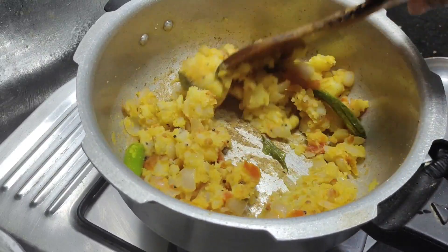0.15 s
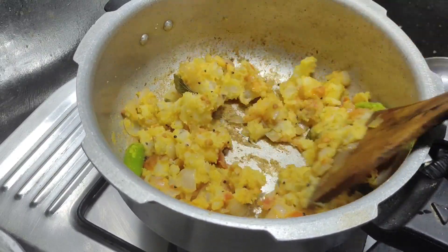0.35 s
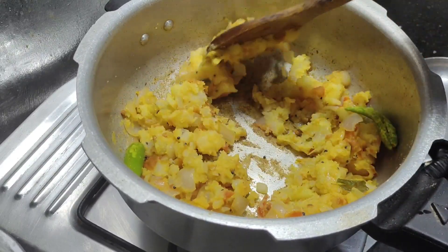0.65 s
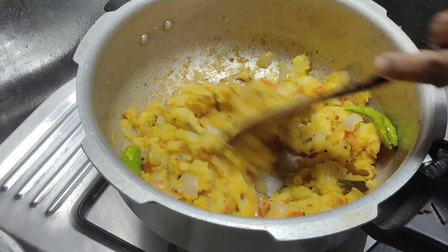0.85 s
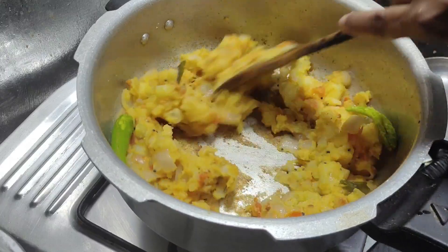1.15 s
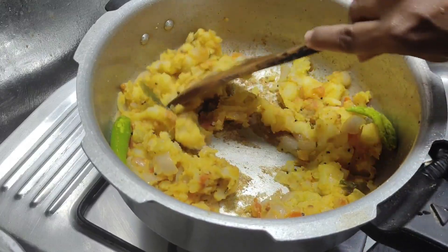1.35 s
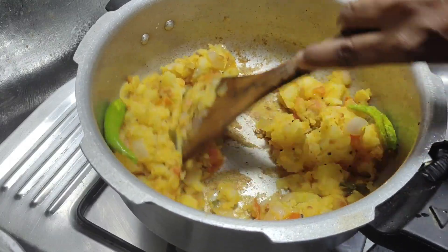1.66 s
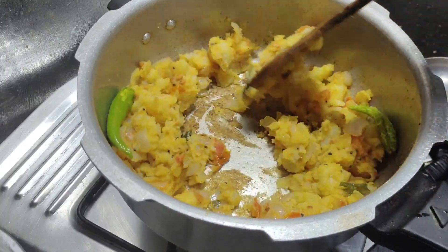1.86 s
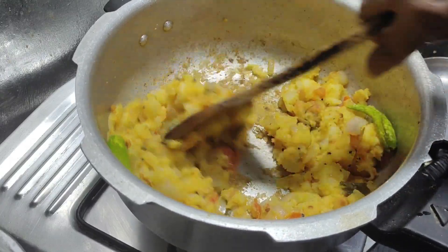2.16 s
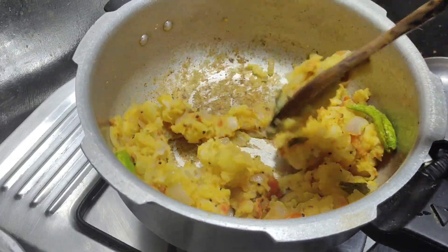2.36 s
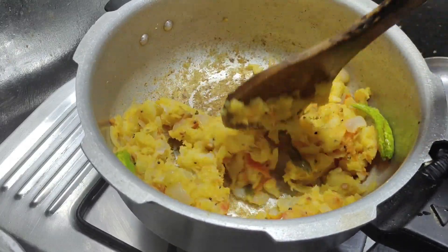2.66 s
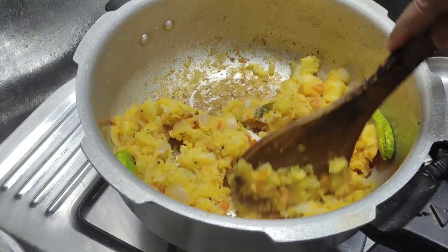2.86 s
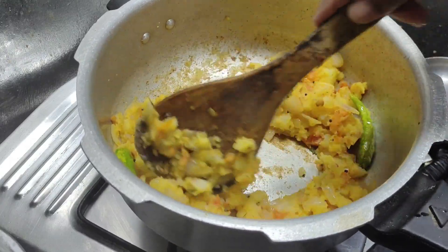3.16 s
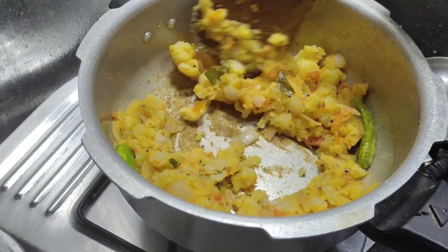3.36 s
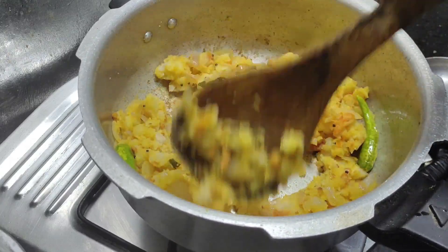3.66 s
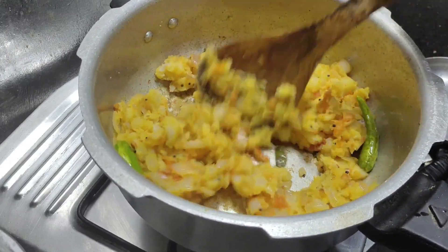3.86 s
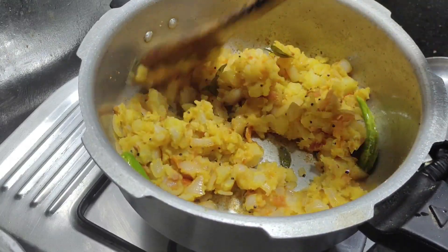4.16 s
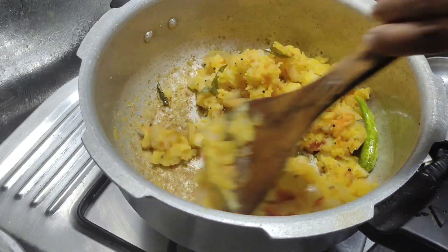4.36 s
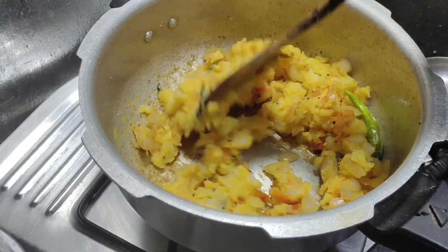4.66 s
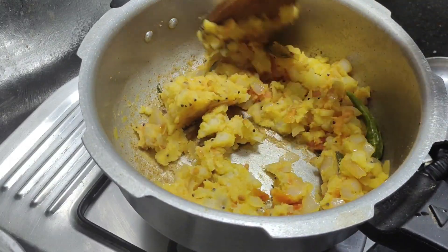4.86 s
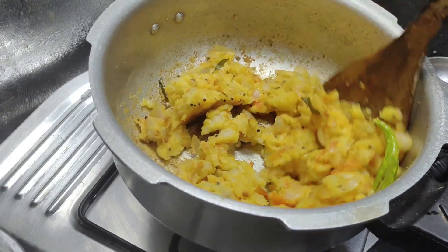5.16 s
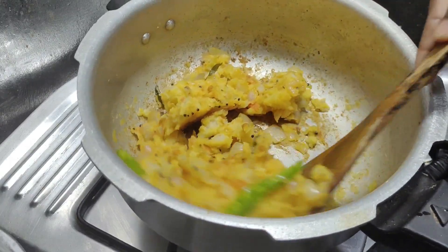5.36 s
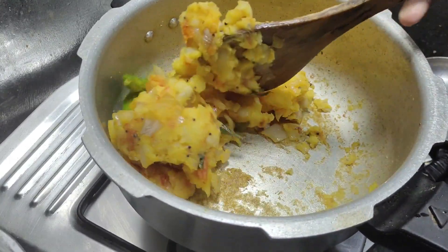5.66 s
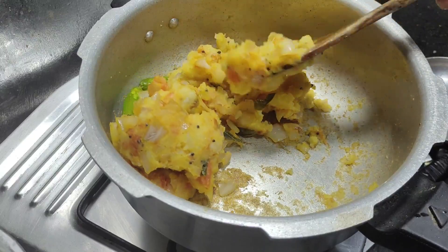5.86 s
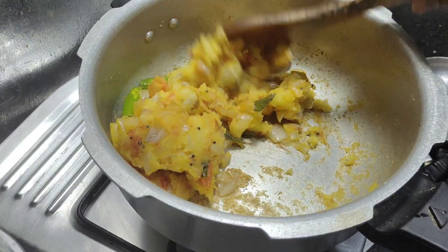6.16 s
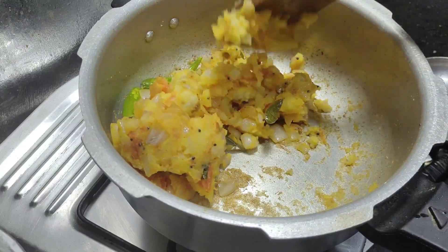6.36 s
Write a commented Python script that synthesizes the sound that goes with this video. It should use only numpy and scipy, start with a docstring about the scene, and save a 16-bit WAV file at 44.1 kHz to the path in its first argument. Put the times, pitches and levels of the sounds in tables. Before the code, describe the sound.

Close stereo pickup in a small kitchen: a wooden spatula works mashed potato in a thick metal pot. It lands again and again with hollow knocks, chattering scrapes and dull low rumbles, grit rasping faintly between. Oil sizzles softly throughout. Small squeaks appear early and midway; late on, a long snagging drag ends in a hard slam, then squeaks and a faint slide.

```python
"""Small kitchen, a close pair of microphones on a thick metal pot: a wooden spatula stirs cooked potato.
Throughout, oil sizzles softly under the food, grit rasps the wall into faint rings and the pot rumbles.
From the first moment the blade lands, again and again: most landings knock, the loaded bottom rumbles, the
edge chatters. Near 1.7 s and 2.9 s the wet edge squeaks; from 5.1 s a long drag snags and rustles into a hard
slam on the wall at 5.4 s, then squeaks; a faint slide ends it. Noise, slips and modes make the sounds."""
import sys
import numpy as np
from scipy import signal
from scipy.fft import rfft, irfft, next_fast_len
from scipy.io import wavfile
from scipy.ndimage import uniform_filter1d

SR = 44100
rng = np.random.default_rng(int(sys.argv[2]) if len(sys.argv) > 2 else 0)


def digitize_waveform(pressure):
    """Quantize a signal to 16-bit integers and store it at the path in sys.argv[1].

    Rows of a 2-D input are taken as channels; values are limited to [-1, 1].
    """
    field = np.atleast_2d(pressure).T
    bounded = np.clip(field, -1, 1)
    quanta = np.round(bounded * 32767).astype(np.int16)
    wavfile.write(sys.argv[1], SR, quanta)


def linear_from_db(decibels):
    """Turn decibels (scalar or array-like) into linear amplitude factors; 0 gives 1."""
    return 10 ** (np.asarray(decibels, float) / 20)


N = 287532  # samples

# colour of the oil and kitchen air: f/Hz, relative density/dB per Hz
SIZZLE_COLOUR = [(35, -55), (60, -36.5), (253, 2.5), (278, -40), (394, -23), (486, -15), (869, -27),
                 (932, -18.5), (2910, -23.5), (4420, -18.5), (15500, -33.5)]
# low rumble while the pot is worked: t/s, level/dB
RUMBLE_LEVEL = [(0.0, -49.5), (0.38, -66.5), (1.5, -51), (1.61, -63), (1.83, -57), (2.58, -73.5),
                (2.78, -53), (2.98, -66), (3.03, -47), (3.18, -57), (3.47, -53), (3.74, -83), (3.96, -50),
                (4.01, -55.5), (5.56, -65.5), (5.63, -54.5), (6.06, -72.5), (6.52, -64)]
# colour of that rumble: f/Hz, relative density/dB per Hz
RUMBLE_SPECTRUM = [(25, -32), (50, -24), (70, -23), (105, -13), (134, 0), (170, 6.5), (200, -12),
                   (300, -38), (15500, -94.5)]
# decay of the kitchen: f/Hz, t60/s
KITCHEN_DECAY = [(150, 0.41), (2000, 0.21), (5000, 0.21), (14000, 0.34)]
# likeness of the two microphones: f/Hz, left-right correlation
LIKENESS = [(60, .95), (300, .93), (700, .2), (15000, 0)]
# colour difference of the two microphones: f/Hz, left minus right level/dB
MICROPHONE_LEAN = [(60, 1), (130, -2.5), (290, 0), (640, -1), (1410, -3), (3100, -2.5), (5500, -8.5),
                   (7000, -14.5), (9000, 4), (11000, -3.5), (12500, -8.5), (15000, -20.5)]
# modes of the pot, damped by the food: f/Hz, relative level/dB, t60/s
POT_MODES = [(134.7, -9, 0.9), (170.6, -6.5, 0.58), (234, -6, 0.044), (285.8, 10.5, 0.041), (346, 7, 0.04),
             (386.7, 2.5, 0.21), (505.2, 0.5, 0.069), (658, 6.5, 0.039), (812, 5.5, 0.01), (880, -3, 0.26),
             (1069, 1, 0.032), (1600, -4, 0.15), (1740, 8.5, 0.033), (1994, -6, 0.07), (2520, 5, 0.57),
             (2860, 10.5, 0.068), (3340, 3.5, 0.17), (3800, -4.5, 0.0474), (4505, 8.5, 0.045),
             (5000, 4.5, 0.077), (5830, 7.5, 0.016), (6300, 1, 0.018), (7130, 11, 0.079), (7380, 13, 0.13)]
# wet food brushed along the metal: start t/s, rise/s, fall/s, peak level/dB
RUSTLES = [(.252, 0.036, 0.11, -49), (5.112, .03, 0.47, -50)]
# the sliding blade snags and rings softly: t/s, peak level/dB, f/Hz, length/s
SNAG_BURSTS = [(1.715, -39, 1414, 0.028), (1.737, -38, 1820, 0.022), (1.756, -36, 1840, 0.015),
               (1.785, -28.5, 1840, 0.008), (5.175, -32.5, 1104, 0.011), (5.199, -33, 1380, 0.0072),
               (5.219, -39.5, 1063, 0.014)]
# the wet edge makes the wall sing: start t/s, end t/s, f/Hz, start level/dB, end level/dB
SQUEAK_TONES = [(2.79, 2.9, 3395, -70, -54), (2.86, 2.975, 3395, -56, -52), (2.96, 3.2, 3395, -64, -72),
                (1.712, 1.745, 4900, -51, -60), (1.735, 1.82, 6700, -56, -49), (5.57, 5.84, 2562, -53, -65),
                (5.64, 5.81, 1725, -58, -67), (5.58, 5.84, 8610, -58, -72)]
# wood knocks on metal: t/s, peak level/dB, f/Hz, t60/s, left minus right level/dB
KNOCK_BLOWS = [(0.5466, -12, 930, 0.015, 2), (0.5477, -18, 2040, 0.011, -3),
               (0.551, -17.5, 1360, 0.0093, -5), (.841, -35.5, 524, 0.019, 3),
               (1.0825, -31.5, 730, 0.039, 3), (1.317, -14, 650, 0.0053, 2),
               (1.8221, -20, 1890, 0.028, -10), (2.101, -41, 700, 0.016, -2),
               (2.951, -23, 2296, 0.033, -9.5), (2.951, -32, 5350, 0.023, -4),
               (3.0015, -32.5, 6500, 0.0074, -3), (3.025, -18.5, 1860, 0.013, -5),
               (3.066, -25.5, 376, 0.026, -4), (3.294, -23, 2000, 0.019, -5),
               (3.367, -16, 1930, 0.013, -9.5), (3.871, -31, 1830, 0.038, -11.5),
               (3.928, -14.5, 1860, 0.017, -5), (3.9307, -22, 800, 0.02, -3),
               (4.2359, -19.5, 1250, 0.0094, -0.5), (4.666, -14.5, 900, 0.027, 1),
               (4.976, -36.5, 600, 0.052, -2), (5.392, -14.5, 720, 0.022, 3), (5.638, -30, 348, 0.082, 1),
               (6.419, -46.5, 6600, 0.011, -28)]
# grit stirred about between strokes: t/s, level/dB
GRIT_AT_REST = [(0, -54.5), (.5, -56.5), (.85, -53.5), (1.3, -56), (2.5, -56), (2.9, -57), (3.502, -54.5),
                (4.2, -56), (4.902, -59), (5.7, -73.5), (6.52, -59.5)]
# grit caught under the edge: start t/s, rise/s, fall/s, peak level/dB
GRIT_BURSTS = [(0, 0.0022, 0.18, -33.5), (0.547, 0.065, 0.25, -37), (1.704, 0.18, 0.49, -50.5),
               (2.95, 0.0046, 0.34, -58), (4.23, 0.0024, 0.52, -49.5), (4.662, 0.02, 0.13, -46.5),
               (4.971, 0.021, 0.37, -43), (5.11, 0.0048, 1., -47), (5.33, 0.063, .03, -47),
               (5.403, 0.11, 0.34, -28.5), (6.269, 0.053, 0.32, -59)]
# colour of grit on metal: f/Hz, relative density/dB per Hz
RASP_COLOUR = [(1180, -8), (2000, -6), (3490, -3), (4670, -6), (6200, -1.5), (9930, -8.5), (10900, -21),
               (12300, -23.5), (15500, -12.5)]
# the blade slides along the metal: start t/s, rise/s, fall/s, chatter level/dB, lower mode from f/Hz, to f/Hz,
# upper mode from f/Hz, to f/Hz, upper mode against the lower level/dB
BLADE_SLIDES = [(0.218, 0.052, 0.15, -65.5, 1200, 1280, 2270, 2300, 5),
                (1.099, 0.043, 0.22, -40, 920, 960, 1280, 2000, -4.5),
                (1.661, 0.14, 0.18, -41, 834, 1130, 1300, 2100, -0.5),
                (3.48, 0.096, 0.088, -75.5, 860, 880, 1550, 1530, 18),
                (5.105, 0.023, 0.47, -41, 1110, 890, 1400, 1350, -3.5),
                (5.33, 0.038, 0.074, -42, 875, 900, 1650, 1685, -4),
                (6.272, 0.058, 0.091, -62.5, 1050, 1090, 1930, 1960, -12)]
# the blade lands and digs in: t/s, hold/s, push on the bottom level/dB, chatter level/dB, lower mode f/Hz
BLADE_LANDINGS = [(0, 0.037, -34.5, -24.5, 1032), (0.552, 0.033, -31, -23.5, 976),
                  (0.837, 0.054, -41, -54, 620), (1.0763, 0.058, -42.5, -44, 774),
                  (1.308, 0.094, -36.5, -45, 685), (1.617, 0.014, -46.5, -60, 800),
                  (1.827, 0.048, -31.5, -36, 1150), (2.096, 0.18, -49.5, -57, 780),
                  (2.643, 0.081, -42, -47.5, 730), (2.953, 0.061, -33.5, -36, 1700),
                  (3.021, 0.11, -39, -42, 690), (3.294, 0.068, -36.5, -40.5, 1550),
                  (3.365, 0.0069, -26.5, -31, 880), (3.872, 0.086, -37.5, -43, 1470),
                  (3.933, 0.025, -28, -33.5, 880), (4.229, 0.051, -29, -32, 880),
                  (4.666, 0.052, -37, -25.5, 967), (4.973, 0.1, -41, -44.5, 1010),
                  (5.411, 0.12, -29.5, -30.5, 1330), (5.627, 0.033, -30.5, -39, 637)]


def evened(x):
    """Scales to rms 1."""
    return x / np.sqrt(np.mean(x ** 2) + 1e-20)


def read(points, hz):
    """Reads a spectrum on a log-frequency axis."""
    f, value = np.transpose(points)
    return np.interp(np.log(hz + 1), np.log(f + 1), value)


def likeness(hz):
    """Left-right correlation of the microphone pair at a frequency."""
    return np.clip(read(LIKENESS, hz), -1, 1)


def add(mix, s, sound):
    """Mixes a sound in at s seconds."""
    part = mix[round(s * SR):][:len(sound)]
    part += sound[:len(part)]


def swell(rise, fall, start_db, end_db):
    """Level in dB that climbs to 0 and falls away, in straight lines."""
    t = np.arange(0, rise + fall, 1 / SR)
    return np.interp(t, [0, rise, rise + fall], [start_db, 0, end_db])


def resonate(x, hz, width):
    """A moving resonance: shifts the curve hz down to zero, smooths, and shifts back."""
    turn = np.exp(2j * np.pi * np.cumsum(hz * np.ones(x.shape[-1])) / SR)
    r = np.exp(-np.pi * width / SR)
    return 2 * (turn * signal.lfilter([1 - r], [1, -r], x / turn)).real


def hiss(spectrum, uneven_db):
    """Two-channel noise of a given colour, with random uneven levels by band and time."""
    frames, hz = N // 128 + 5, np.fft.rfftfreq(512, 1 / SR)
    a, b, c, d, uneven = rng.standard_normal((frames, 257, 5)).T
    uneven = uniform_filter1d(uneven, size=2, axis=0)  # across frequency
    uneven = evened(uniform_filter1d(uneven, size=22, axis=1))  # along time
    same, left = likeness(hz)[:, None], a + 1j * b
    right = same * left + np.sqrt(1 - same ** 2) * (c + 1j * d)
    z = np.array([left, right]) * linear_from_db(read(spectrum, hz)[:, None] + uneven_db * uneven)
    return evened(signal.istft(z, nperseg=512, noverlap=384)[1][:, :N])


def slips(per_s, spread_db):
    """Stick-slip friction: random clicks, a few large."""
    size = linear_from_db(spread_db * np.minimum(rng.exponential(1, N), 4)) * rng.choice([-1., 1.], N)
    return evened(size * (rng.random(N) < per_s / SR))


def pot(low_hz, high_hz):
    """Impulse response of the modes in a range, energy 1; high modes reach the microphones out of step."""
    t, out = np.arange(SR // 2) / SR, np.zeros((2, SR // 2))
    for (hz, db, t60), chance in zip(POT_MODES, rng.uniform(-0.81, 1, len(POT_MODES))):
        apart = np.arccos(likeness(hz)) * chance * np.array([[1], [-1]])
        ring = linear_from_db(db - 60 * t / t60) / np.sqrt(t60) * np.sin(2 * np.pi * hz * t + apart)
        out += (low_hz <= hz < high_hz) * ring * np.minimum(t * hz, 1)  # fades in over one cycle
    return out / np.linalg.norm(out[0])


def ringing(force, body):
    """Drives a body with a force."""
    return signal.oaconvolve(force[None], body, axes=1)[:, :N]


def sizzle():
    """Soft frying hiss: steady coloured noise, randomly uneven across frequency and time."""
    return linear_from_db(-61.5) * hiss(SIZZLE_COLOUR, uneven_db=5.0)


def kitchen(x):
    """Sparse echoes of random sign, each band dying at its own speed; long waves reach both mics alike."""
    taps = np.zeros((2, SR))
    at = np.arange(200, SR - 20, 20) + rng.integers(0, 20, (2, (SR - 201) // 20))
    np.put_along_axis(taps, at, rng.choice([-1., 1.], at.shape), 1)
    hz, t, z = signal.stft(taps, SR, nperseg=256)
    same = likeness(hz)[:, None]
    z[1] = same * z[0] + np.sqrt(1 - same ** 2) * z[1]
    decay = linear_from_db(-60 * t / read(KITCHEN_DECAY, hz)[:, None])
    tail = signal.istft(z * decay, SR, nperseg=256)[1]
    return ringing(x.mean(0), tail / np.linalg.norm(tail[0]))


def rumble():
    """The pot shudders on the stove under the stirring: low coloured noise that follows a level curve."""
    level = linear_from_db(np.interp(np.arange(N) / SR, *np.transpose(RUMBLE_LEVEL)))
    return level * hiss(RUMBLE_SPECTRUM, uneven_db=2.)


def rustle():
    """Wet food brushed along the metal: fine crackling grains in the low treble."""
    level = np.zeros(N)
    for s, rise, fall, db in RUSTLES:
        add(level, s, linear_from_db(db + swell(rise, fall, start_db=-3, end_db=-10.5)))
    band = signal.butter(3, [2380, 5800.], "band", fs=SR, output="sos")  # Hz
    grains = [slips(per_s=3000, spread_db=3.), slips(per_s=3600, spread_db=3.)]  # left, right
    return level * evened(signal.sosfilt(band, grains))


def snags():
    """The sliding blade catches: short soft-edged bursts of one blade mode."""
    out = np.zeros(N)
    for s, db, hz, length in SNAG_BURSTS:
        t = np.arange(0, length, 1 / SR)
        shape = np.sin(np.pi * (t / length) ** 0.49) ** 2  # peaks early
        add(out, s, linear_from_db(db) * shape * np.sin(2 * np.pi * hz * t))
    return out


def squeak():
    """The wet edge makes the wall sing: thin tones, slightly unsteady in level."""
    out = np.zeros(N)
    for s, end, hz, first_db, last_db in SQUEAK_TONES:
        t = np.arange(0, end - s, 1 / SR)
        drift = evened(uniform_filter1d(rng.standard_normal(SR), size=700))[:len(t)]
        waver = 1 + 0.33 * drift
        level = linear_from_db(first_db + (last_db - first_db) * t / t[-1]) * signal.windows.tukey(len(t), .5)
        add(out, s, np.sqrt(2) * level * waver * np.sin(2 * np.pi * hz * t))
    return out


def slam():
    """The edge hits the bare wall and stays on it: one hard blow rings the upper modes, damped at once."""
    ring = pot(low_hz=1200, high_hz=6900)  # wood is too soft to reach the highest
    out, t = np.zeros((N, 2)), np.arange(ring.shape[1]) / SR
    damped = ring * linear_from_db(18 - 60 * t / 0.034)  # extra decay, t60 0.034 s
    add(out, 5.4047, damped.T)
    return out.T


def knocks():
    """A few quick cycles of wood on metal with a crack, and a blow that sets the pot ringing."""
    crack_width = 0.87  # over the knock's pitch; also the crack's share
    dry, blows, t = np.zeros((2, N)), np.zeros(N), np.arange(4000) / SR
    for s, db, hz, t60, pan_db in KNOCK_BLOWS:
        attack = np.sin(np.pi / 2 * np.minimum(t / 0.00066, 1)) ** 2
        fall = linear_from_db(-60 * t / t60) * attack
        crack = resonate(rng.standard_normal(len(t)), hz, crack_width * hz)
        crack = evened(resonate(crack, hz, crack_width * hz))
        knock = fall * (np.sin(2 * np.pi * hz * t) + crack_width * crack)
        treble_edge = min(1.42 * hz, SR / 3)
        knock = signal.sosfilt(signal.butter(2, treble_edge, fs=SR, output="sos"), knock)
        knock = linear_from_db(db) * knock / abs(knock).max()
        add(dry[0], s + 0.00022, linear_from_db(pan_db / 2) * knock)  # the left microphone is a little further off
        add(dry[1], s, linear_from_db(-pan_db / 2) * knock)
        add(blows, s, knock)
    return dry + linear_from_db(-27.5) * ringing(blows, pot(low_hz=0, high_hz=SR))


def grit():
    """Level of the grit: bursts that swell and die over a low rest level."""
    level = linear_from_db(np.interp(np.arange(N) / SR, *np.transpose(GRIT_AT_REST)))
    for s, rise, fall, db in GRIT_BURSTS:
        add(level, s, linear_from_db(db + swell(rise, fall, start_db=-7.5, end_db=-59)))
    return level


def slide(s, rise, fall, chatter_db, from_hz, to_hz, upper_from_hz, upper_to_hz, upper_db):
    """A swell and a fade while the blade's modes glide."""
    t = np.arange(0, rise + fall, 1 / SR)
    arch = np.interp(t, [0, rise, rise + fall], [1, 0, 1]) ** 2
    chatter = linear_from_db(chatter_db + arch * np.where(t < rise, -18, -29.5))  # dB at start, at end
    push = linear_from_db(-13.5) * chatter
    hz = np.linspace([from_hz, upper_from_hz], [to_hz, upper_to_hz], len(t)).T
    width_hz = 263  # bare metal damps the blade less than food does
    return s, push, chatter, hz, upper_db, width_hz


def landing(s, hold, push_db, chatter_db, hz):
    """A sudden start, a slow loss while the blade digs, a quick one as it lifts."""
    t = np.arange(0, hold + .35, 1 / SR)
    held, lifted = np.minimum(t / hold, 1), np.maximum(t - hold, 0)
    start = np.minimum(t / 0.0036, 1)
    push = start * linear_from_db(push_db - 6.5 * held - 210. * lifted)  # dB over the hold, dB/s after it
    chatter = start * linear_from_db(chatter_db - 6 * held - 190. * lifted)
    loaded = push_db > chatter_db  # else high on the wall, where no food loads the blade
    width_hz = 1100 if loaded else 310
    sag = np.exp(-0.37 * t * loaded)  # the modes sink as food loads the blade
    modes = np.outer([hz, 1.58 * hz], sag)
    return s, push, chatter, modes, -8.5, width_hz  # upper mode 8.5 dB under the lower


def strokes():
    """The dragging edge drives the bottom, chatters in two modes of the blade and rasps the wall."""
    t, push, wood, struck, rasp = np.arange(N) / SR, np.zeros(N), np.zeros(N), np.zeros(N), grit()
    dense, coarse = slips(per_s=2000, spread_db=3.5), slips(per_s=1500, spread_db=3.5)
    # slides stutter more coarsely and shake the wall less
    moves = [(landing(*row), dense, 1) for row in BLADE_LANDINGS]
    moves += [(slide(*row), coarse, .7) for row in BLADE_SLIDES]
    for (s, force, chatter, modes, upper_db, width), friction, wall_share in moves:
        part = friction[round(s * SR):][:len(force)]
        hz, upper_hz = modes[:, :len(part)]
        lower = resonate(resonate(part, hz, width), hz, width)
        lower = evened(resonate(lower, hz, 2.25 * width))
        upper = resonate(part, upper_hz, 1.4 * width)
        upper = evened(resonate(upper, upper_hz, 2.5 * width))
        blade = chatter[:len(part)] * (lower + linear_from_db(upper_db) * upper)
        add(wood, s, blade)
        add(struck, s, wall_share * blade)
        add(push, s, force)
    bottom = ringing(push * slips(per_s=980, spread_db=1.0), pot(low_hz=0, high_hz=600))
    # quick echoes inside the pot
    hollow = rng.standard_normal((2, 2000)) * linear_from_db(-20.0 - 60 * t[:2000] / 0.039)
    hollow[[0, 1], [17, 0]] = 1  # the direct sound reaches the left microphone 17 samples later
    chatter = ringing(wood, hollow / np.linalg.norm(hollow[0]))
    wall = linear_from_db(-17.0) * ringing(struck, pot(low_hz=600, high_hz=2000))
    scratches = rasp * slips(per_s=4000, spread_db=2.5)
    rings = linear_from_db(-9.5) * ringing(scratches, pot(low_hz=2000, high_hz=SR))
    return bottom + chatter + wall + rings + linear_from_db(0.7) * rasp * hiss(RASP_COLOUR, uneven_db=5.5)


def scene():
    """Spatula and pot in the kitchen, over the sizzle; the near sounds carry little deep bass."""
    near = strokes() + knocks() + slam() + squeak() + snags() + rustle()
    near = signal.sosfilt(signal.butter(3, 145., "high", fs=SR, output="sos"), near)
    return near + linear_from_db(-5.0) * kitchen(near) + sizzle() + rumble()


def top_cut(x):
    """Nothing passes above the cut-off."""
    return signal.sosfilt(signal.butter(12, 15660, fs=SR, output="sos"), x)


def record(dry):
    """The two microphones differ in colour; low cut and band limit; peaks clip."""
    size = next_fast_len(N)
    lean_db = read(MICROPHONE_LEAN, np.fft.rfftfreq(size, 1 / SR)) * np.array([[.5], [-.5]])
    x = irfft(rfft(dry, size) * linear_from_db(lean_db), size)[:, :N]
    x = signal.sosfilt(signal.butter(3, 60., "high", fs=SR, output="sos"), x)  # low cut
    x = signal.sosfilt(signal.cheby2(12, 60, 16000, fs=SR, output="sos"), x)  # band limit
    mix = np.clip(x, -1, 1)
    return top_cut(mix)


dry = scene()
out = record(dry)
digitize_waveform(out)
```